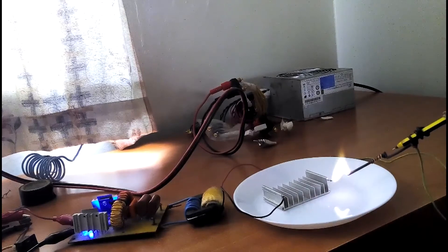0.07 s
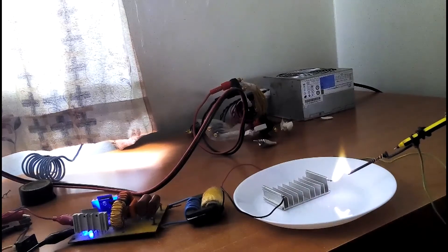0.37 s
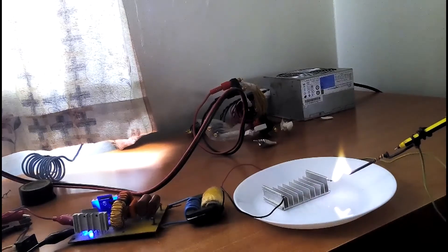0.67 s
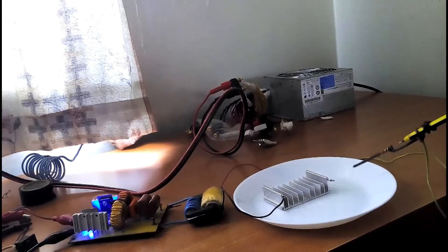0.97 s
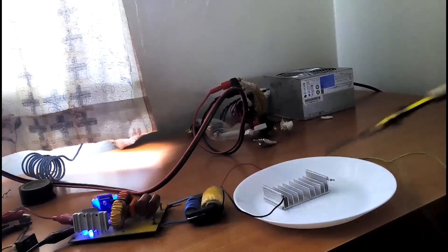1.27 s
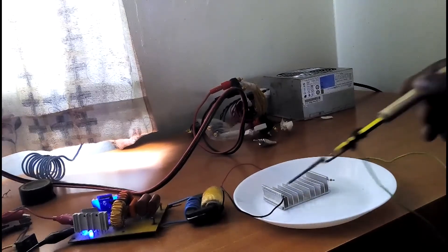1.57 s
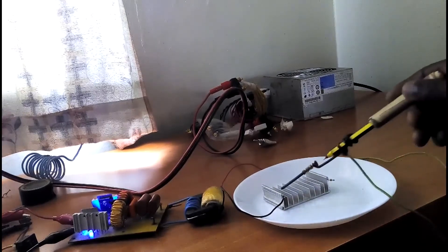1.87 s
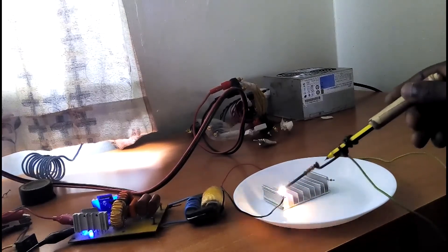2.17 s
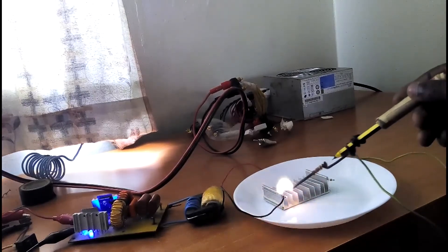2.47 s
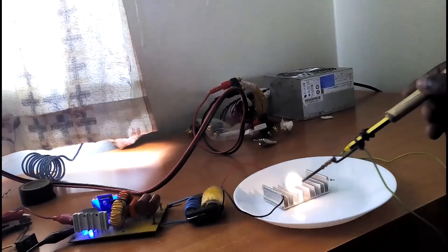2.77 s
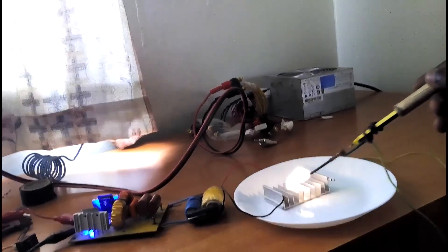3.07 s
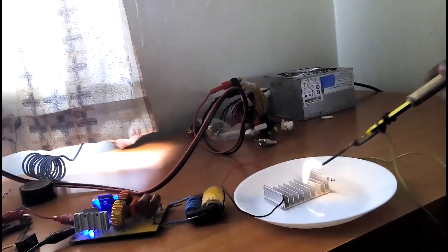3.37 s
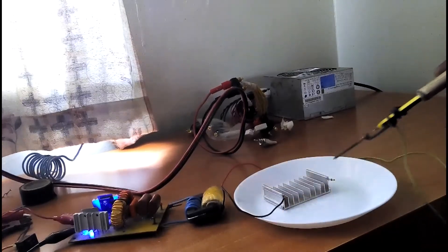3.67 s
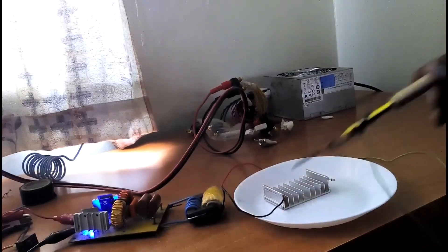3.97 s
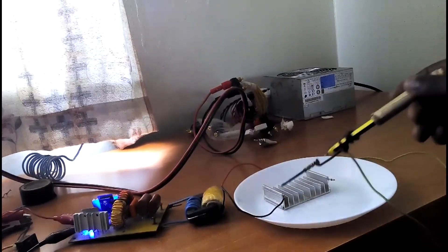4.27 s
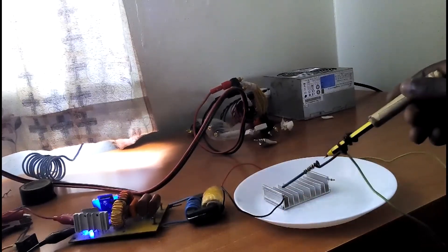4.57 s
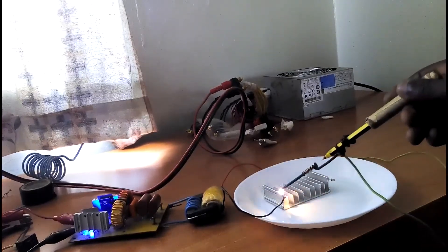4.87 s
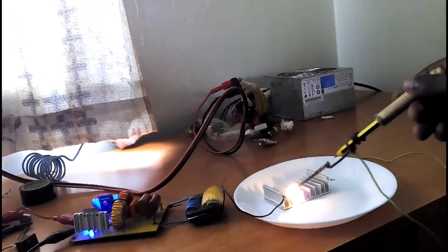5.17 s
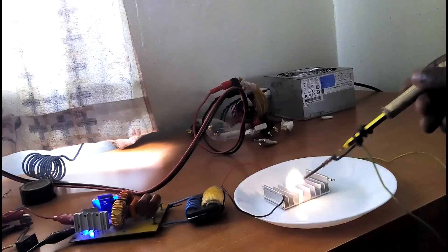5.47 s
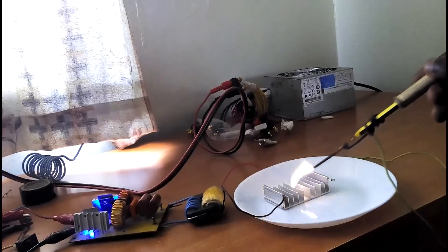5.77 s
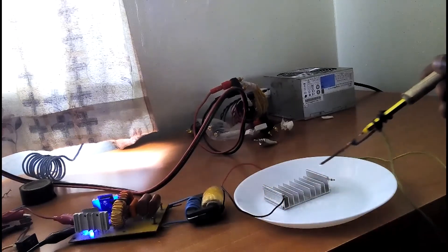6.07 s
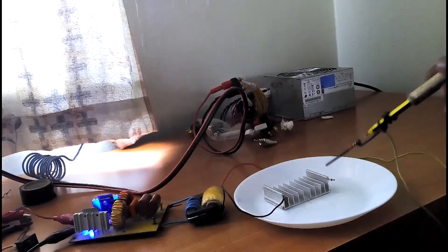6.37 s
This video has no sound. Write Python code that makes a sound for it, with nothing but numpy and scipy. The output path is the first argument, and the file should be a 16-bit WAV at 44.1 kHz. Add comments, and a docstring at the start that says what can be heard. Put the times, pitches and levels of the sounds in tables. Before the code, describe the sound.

Three brief bouts of sparking crackle and thin squeals interrupt the soft sizzle of a high-voltage arc on an indoor workbench.

```python
"""A small room, one microphone near a workbench, a steady hiss behind everything.
A high-voltage arc is drawn from a heat sink on a plate, three times. It burns with a faint sizzle;
stretched too far it squeals and tears in a burst of tiny sparks, and the unloaded transformer
gives a short falling whistle. Something knocks once on the wooden bench, and loose metal ticks."""
import sys
import numpy as np
from scipy import signal
from scipy.fft import rfft, irfft, next_fast_len
from scipy.io import wavfile

SR = 44100
rng = np.random.default_rng(int(sys.argv[2]) if len(sys.argv) > 2 else 0)


def wav_record(signal):
    """Record a signal, one row per channel, as 16-bit PCM in the file named by sys.argv[1]."""
    frames = np.transpose(np.atleast_2d(signal))
    bounded = np.clip(frames, -1, 1)
    # unit amplitude maps onto the largest positive 16-bit level
    quanta = np.round(bounded * 32767).astype(np.int16)
    wavfile.write(sys.argv[1], SR, quanta)


N = 282681
TIME = np.arange(N) / SR


def from_db(db):
    """Decibels to gain."""
    return 10 ** (np.asarray(db) / 20)


def unit_rms(x):
    """Scale to unit power."""
    return x / np.sqrt(np.mean(x ** 2) + 1e-20)


def cut(x, hz, kind, order):
    """Butterworth low- or high-pass."""
    return signal.sosfilt(signal.butter(order, min(hz, .45 * SR), kind, fs=SR, output="sos"), x + 1e-18)


def flutter(rate_hz):
    """Random wavering of spread 1."""
    return unit_rms(cut(rng.standard_normal(N), rate_hz, "low", order=2))


def swell(full_s, rise_s, hold_s, fall_s):
    """An envelope that grows exponentially, holds at one and dies away."""
    return np.exp(np.minimum(TIME - full_s, 0) / rise_s - np.maximum(TIME - full_s - hold_s, 0) / fall_s)


def tone(hz):
    """A sine of unit power that follows a moving pitch."""
    return np.sqrt(2) * np.sin(2 * np.pi * np.cumsum(hz) / SR)


def coloured(x, spectrum, peaks=()):
    """Give a steady excitation a smooth spectrum with peaks and dips on it, at unit power."""
    size = next_fast_len(N)
    hz = np.maximum(np.arange(size // 2 + 1) * SR / size, 1)
    points, levels = np.transpose(spectrum)
    db = np.interp(np.log(hz), np.log(points), levels)
    for centre, width, height in peaks:
        db = db + height / (1 + (2 * (hz - centre) / width) ** 2)
    return unit_rms(irfft(rfft(x, size) * from_db(db), size)[:N])


def struck(force, modes):
    """Damped modes set ringing by a force."""
    out = np.zeros(N)
    for hz, mode_db, t60 in modes:
        radius, angle = from_db(-60 / (t60 * SR)), 2 * np.pi * hz / SR
        feedback = [2, -4 * radius * np.cos(angle), 2 * radius * radius]
        out += from_db(mode_db) * signal.lfilter([1, 0, -1], feedback, force + 1e-18)
    return out


def sparks(per_s, spread_db):
    """Tiny discharges of uneven size at random moments."""
    fires = rng.random(N) < per_s / SR
    return fires * rng.choice([-1, 1], N) * from_db(spread_db * rng.standard_normal(N))


# The hiss at the microphone. Each row: frequency in Hz, relative level in dB.
HISS_COLOUR = [(25, -3), (60, 0.5), (150, 1.5), (300, 0.5), (700, -3), (1800, -4.5), (3500, -3),
               (4900, -1.5), (5500, -.5), (6400, -3), (7100, -11), (8100, -18.5), (11000, -19.5),
               (15500, -22)]

def background(hiss_db=-55, waver_db=0.94, split_hz=2800, whine_hz=9810, whine_db=-80):
    """Steady hiss whose treble wavers gently, with a thin, unsteady whine in it."""
    hiss = from_db(hiss_db) * coloured(rng.standard_normal(N), HISS_COLOUR)
    treble = cut(hiss, split_hz, "high", order=3) * from_db(waver_db * flutter(rate_hz=5.8))
    whine = from_db(whine_db) * flutter(rate_hz=70) * np.sqrt(2) * np.sin(2 * np.pi * whine_hz * TIME)
    return cut(hiss, split_hz, "low", order=3) + treble + whine


# The walls all around. Each row: low and high band edge in Hz, seconds to fade by 60 dB.
ROOM_BANDS = [(150, 2000, 0.28), (2030, 8500, 0.32), (8500, 21000, .28)]
# Surfaces near the microphone. Each row: delay in seconds, gain against the direct sound.
NEAR_ECHOES = [(.0023, 0.15), (.0061, -0.12), (0.0113, 0.16)]

def room(x, wet_db, first_wall_s=0.0073):
    """Sound reaches the microphone directly, off near surfaces and as a short diffuse tail."""
    t, tail = TIME[:SR // 2], 0
    for low_hz, high_hz, t60 in ROOM_BANDS:
        band = cut(cut(rng.standard_normal(len(t)), low_hz, "high", order=4), high_hz, "low", order=4)
        tail = tail + band * from_db(-60 * t / t60) * (t > first_wall_s)
    response = from_db(wet_db) * tail / np.sqrt(np.sum(tail ** 2))
    response[0] = 1
    for delay, gain in NEAR_ECHOES:
        response[round(delay * SR)] += gain
    return signal.fftconvolve(x, response / np.sqrt(np.sum(response ** 2)))[:N]


# One knock on the bench nearby. Each row: time in seconds, force in dB, contact cut-off in Hz.
KNOCK_CONTACTS = [(3.098, -21.5, 564), (3.1070, -31.5, 1100), (3.1135, -23.5, 541), (3.1204, -21, 696),
                  (3.1256, -24, 1000), (3.129, -17, 1090), (3.1434, -17.5, 415)]
# The wooden top, then the metal on it. Each row: pitch in Hz, gain in dB, seconds to fade by 60 dB.
WOOD_MODES = [(520, -2.5, 0.032), (655, -10, 0.031), (820, -1, 0.012), (1200, -11.5, 0.006)]
METAL_MODES = [(3550, -1.5, 0.0274), (3750, -7, 0.018)]

def knock(softness_hz=1300, bass_hz=400, tick_db=-11, tick_db_per_octave=8):
    """A quick rattle of contacts thuds on the wood; the harder ones shake the loose metal more."""
    thuds, ticks = np.zeros(N), np.zeros(N)
    for s, force_db, contact_hz in KNOCK_CONTACTS:
        click = from_db(force_db) * (np.arange(N) == round(s * SR))
        thuds += cut(click, contact_hz, "low", order=2)
        ticks += from_db(tick_db + tick_db_per_octave * np.log2(contact_hz / 1000)) * click
    wood = cut(cut(struck(thuds, WOOD_MODES), softness_hz, "low", order=6), bass_hz, "high", order=3)
    metal = cut(cut(struck(ticks, METAL_MODES), 4000, "low", order=4), 3000, "high", order=2)
    return wood + metal


# The arc's flame flares. Each row: peak time in seconds, sizzle in dB, pitch in Hz, note level in dB.
FLAME_FLARES = [(2.61, -65, 4150, -53), (2.69, -54, 3980, -52.5), (2.87, -64, 4300, -58),
                (3.08, -55.5, 4750, -58), (3.27, -56, 3350, -58), (5.27, -62.5, 3720, -54)]
FLARE_RISE_S, FLARE_FALL_S = .04, .04

def flares(wander_hz=190, sag_hz_per_s=740):
    """Each flare of the flame sings one soft, unsteady, sinking note."""
    out, wander = np.zeros(N), wander_hz * flutter(rate_hz=540)
    for s, _, hz, note_db in FLAME_FLARES:
        pitch = hz + wander - sag_hz_per_s * (TIME - s)
        out += from_db(note_db) * swell(s, FLARE_RISE_S, 0, FLARE_FALL_S) * tone(pitch)
    return out


# The arc alight on the heat sink. Each row: start in seconds, length in seconds, sizzle in dB.
ARC_BURNS = [(0, 2.1, -63), (2.565, 1.06, -60.5), (4.95, 0.96, -60)]
# The colour of its sizzle. Each row: frequency in Hz, relative level in dB.
SIZZLE_SPECTRUM = [(1500, -25), (2400, -24.5), (3200, 1), (3700, -11), (4150, -6.5), (4900, -1.5),
                   (5500, -13), (6500, -7), (8000, -19.5), (15000, -37.5)]
# The resonances in it. Each row: centre in Hz, width in Hz, height in dB.
SIZZLE_RESONANCES = [(2410, 100, 11), (3720, 120, 8.5), (4140, 91, 7), (4300, 180, -1), (5500, 310, 10)]

def sizzle(flicker_db=3.0, sing_db=-13, glide_hz=130, come_and_go_db=6):
    """The burning arc frets softly, louder as it flares; thin tones glide around its resonances."""
    strength = sum(from_db(db) * swell(s, .05, length, .12) for s, length, db in ARC_BURNS)
    strength += sum(from_db(db) * swell(s, FLARE_RISE_S, 0, FLARE_FALL_S) for s, db, _, _ in FLAME_FLARES)
    grains = coloured(sparks(per_s=4900, spread_db=7), SIZZLE_SPECTRUM, SIZZLE_RESONANCES)
    tones = np.zeros(N)
    for hz, width_hz, peak_db in SIZZLE_RESONANCES:
        pitch = hz + glide_hz * flutter(rate_hz=6) + .5 * width_hz * flutter(rate_hz=304)
        come_and_go = from_db(come_and_go_db * np.tanh(flutter(rate_hz=11.5)))
        tones += from_db(sing_db + peak_db) * unit_rms(come_and_go * tone(pitch))
    singing = coloured(tones, SIZZLE_SPECTRUM) * np.std(tones)
    return strength * from_db(flicker_db * flutter(rate_hz=16)) * unit_rms(grains + singing)


# The transformer, in the same room. Each row: time of full strength in seconds, hold in seconds,
# level in dB, seconds from reaching full strength to the middle of the sag.
TRANSFORMER_WHISTLES = [(3.349, .086, -20.5, .076), (3.521, 0.085, -24, 0.045), (5.946, 0.073, -20.5, .059)]
# The partials of its whistle. Each row: distance below the pitch in Hz, relative level in dB.
WHISTLE_PARTIALS = [(0, -0.6), (3870, -20.5)]

def whistles(high_hz=12310, low_hz=11600, sag_s=.017, wander_hz=30, shimmer_db=3.0):
    """With the arc gone, the transformer sings a slightly shaky tone that sinks along an S-curve."""
    out, wander = np.zeros(N), wander_hz * flutter(rate_hz=220)
    for s, hold, level_db, sag_after in TRANSFORMER_WHISTLES:
        sunk = .5 + .5 * np.tanh(.5 * (TIME - s - sag_after) / sag_s)
        hz = high_hz + (low_hz - high_hz) * sunk + wander
        partials = sum(from_db(db) * tone(hz - below_hz) for below_hz, db in WHISTLE_PARTIALS)
        out += from_db(level_db) * swell(s, rise_s=.0086, hold_s=hold, fall_s=.0033) * partials
    return out * from_db(shimmer_db * flutter(rate_hz=150))


# The unsteady arc over the heat sink. Each row: time of full strength in seconds, hold in seconds,
# level in dB, first and last pitch in Hz, roughness from 0 to 1.
ARC_SQUEALS = [(0.963, 0.039, -24, 8250, 8120, 0.88), (0.969, 0.04, -41.5, 4250, 4210, 0.15),
               (1.01, .006, -14, 7920, 7970, .42), (1.013, .006, -37, 15300, 15200, .3),
               (1.021, 0.024, -32, 5420, 5280, 0.36), (1.024, 0.022, -23, 7730, 7660, 0.28),
               (1.028, 0.025, -33.5, 12600, 12140, .6), (1.044, 0.03, -46.5, 3400, 3330, .25),
               (3.2, .025, -44, 5520, 5500, 0.2), (3.314, 0.0087, -35.5, 6370, 6480, .4),
               (3.322, .003, -25, 5500, 5450, 0.33), (3.338, 0.048, -42, 5460, 5440, 0.1),
               (3.382, .055, -55, 4690, 4600, .1), (3.469, 0.028, -47, 3750, 3640, .2),
               (5.87, 0.013, -31.5, 9790, 10020, 0.05), (5.888, .003, -29, 3800, 3800, .05),
               (5.889, 0.0018, -21.5, 9730, 10000, 0.2), (5.934, 0.038, -39.5, 3070, 2815, 0.55)]

def squeals(wander_hz=420, flutter_db=4):
    """The stretched arc oscillates in short glides; roughness shakes both its pitch and its strength."""
    out = np.zeros(N)
    for s, hold, level_db, first_hz, last_hz, rough in ARC_SQUEALS:
        glide = np.interp(TIME, [s, s + hold], [first_hz, last_hz])
        hz = glide + rough * wander_hz * flutter(rate_hz=652)
        strength = from_db(level_db + rough * flutter_db * flutter(rate_hz=260))
        out += strength * swell(s, rise_s=.0026, hold_s=hold, fall_s=.0043) * tone(hz)
    return out


# The arc tears, in the foreground. Each row: time of full strength in seconds, level in dB,
# rise and hold in seconds, low and high edge in Hz, a ring's pitch in Hz and height in dB,
# the low skirt's ring pitch in Hz and gain in dB.
ARC_TEARS = [(0.944, -41.5, .002, .004, 4000, 9000, 8550, 12, 2190, 5),
             (0.967, -31.5, .004, 0.069, 5040, 8300, 5930, 14, 2190, -8),
             (1.026, -25, .006, 0.0081, 3700, 15000, 10300, 9, 2250, 19),
             (3.207, -32.5, 0.01, 0.026, 2930, 13700, 4860, 2, 2470, 19.5),
             (3.326, -25.5, 0.0094, 0.012, 2304, 14000, 2420, 7.5, 2480, 9),
             (3.49, -27, .002, 0.026, 2630, 13000, 7100, 9.5, 1644, 17.5),
             (5.873, -30.5, 0.0078, 0.0085, 3300, 11400, 9100, 10, 2300, 5),
             (5.896, -25, 0.0098, 0.023, 2240, 14000, 2310, 11, 1360, 12.5)]
# The colour of the sparks. Each row: frequency in Hz, relative level in dB.
SPARK_SPECTRUM = [(1200, -7), (2400, -5), (3300, 2.5), (4300, 2), (6000, 0.5), (7300, 1.5), (9200, -1),
                  (11000, 0), (12200, 3), (13200, 4), (15500, -3.5)]
# The fins and plate favour some pitches and cancel others. Each row: centre and width in Hz, gain in dB.
FIN_PEAKS = [(3180, 410, 2.5), (3470, 150, -9.5), (3724, 270, 2.5), (4670, 290, 6.5), (5020, 220, -10.5),
             (5543, 240, 15.5), (5760, 345, -17), (6660, 250, 4.5), (6835, 130, -14), (7600, 417, 5),
             (8840, 293, -9), (12950, 200, -15)]

def tears(bass_hz=3300, treble_hz=9000, ring_width_hz=280, skirt_db=-21, skirt_width_hz=170,
          ripple_db=5, ripple_width_hz=130, fall_s=.013):
    """Showers of sparks swell as the arc loses hold, mid band first, and die as it goes out."""
    out = np.zeros(N)
    for s, level_db, rise, hold, low_hz, high_hz, ring_hz, ring_db, skirt_hz, skirt_ring_db in ARC_TEARS:
        # the arc stands somewhere else each time, so each shower gets chance peaks and dips of its own
        ripples = [(bass_hz + place * (treble_hz - bass_hz), ripple_width_hz, ripple_db * (2 * height - 1))
                   for place, height in rng.random(size=(24, 2))]
        peaks = FIN_PEAKS + ripples + [(ring_hz, ring_width_hz, ring_db)]
        shower = coloured(sparks(per_s=5500, spread_db=2.5), SPARK_SPECTRUM, peaks)
        shower = cut(shower, high_hz, "low", order=2)
        body = cut(shower, low_hz, "high", order=12)
        # small sparks radiate little bass: only a weak, late skirt with one ring lies under the low edge
        skirt = cut(cut(shower, 1200, "high", order=4), low_hz, "low", order=4)
        resonator = signal.iirpeak(skirt_hz, skirt_hz / skirt_width_hz, fs=SR)
        skirt = skirt + from_db(skirt_ring_db) * signal.lfilter(*resonator, skirt)
        below_treble = cut(body, treble_hz, "low", order=5)
        bands = [(cut(below_treble, bass_hz, "high", order=5), 0),
                 (cut(body, treble_hz, "high", order=5), .0066),
                 (cut(below_treble, bass_hz, "low", order=5), .0073),
                 (from_db(skirt_db) * skirt, .015)]
        burst = sum(band * swell(s + lag_s, rise, hold, fall_s) for band, lag_s in bands)
        out += from_db(level_db) / np.std(body) * burst
    return out


def scene():
    """Arc, transformer and bench reach one microphone through the room, over the hiss."""
    arc = room(tears() + squeals() + sizzle() + flares(), wet_db=-4.5)
    transformer = room(whistles(), wet_db=-6.0)
    bench = room(knock(), wet_db=-10.5)
    return (arc + transformer + bench + background())[None]


def record(dry):
    """The top is cut steeply above 15550 Hz."""
    return signal.sosfilt(signal.ellip(12, .1, 80, 15550, fs=SR, output="sos"), dry)


dry = scene()
out = record(dry)
wav_record(out)
```